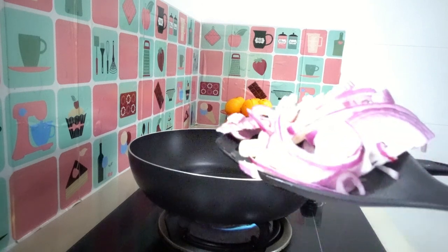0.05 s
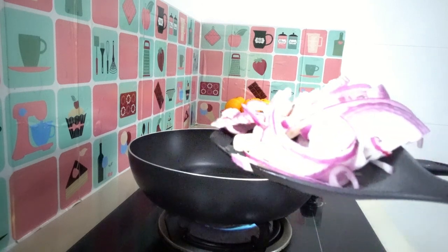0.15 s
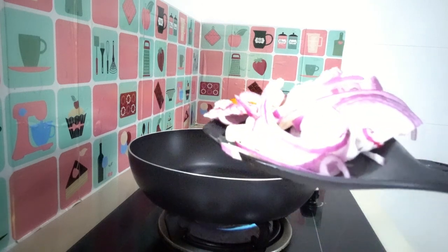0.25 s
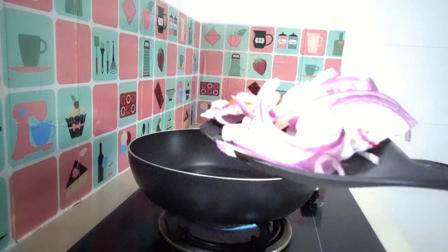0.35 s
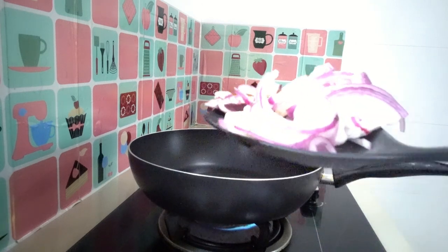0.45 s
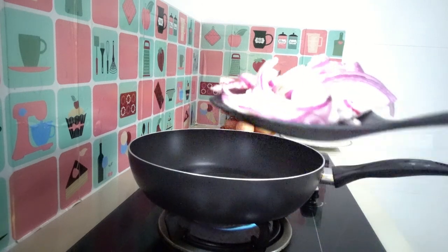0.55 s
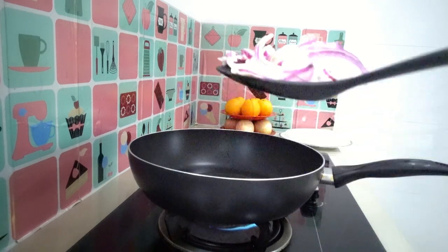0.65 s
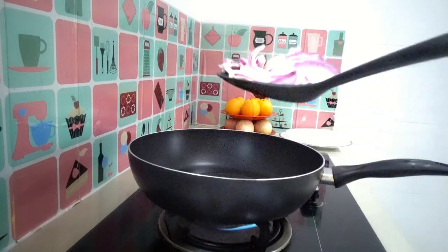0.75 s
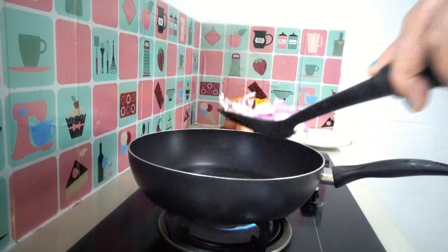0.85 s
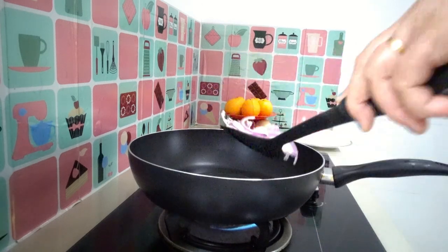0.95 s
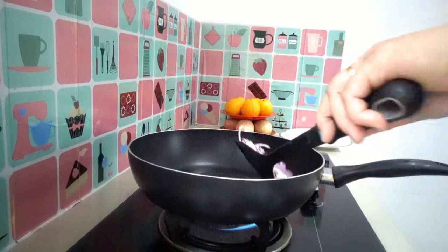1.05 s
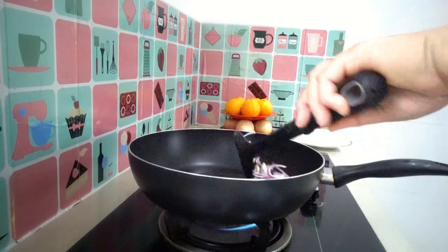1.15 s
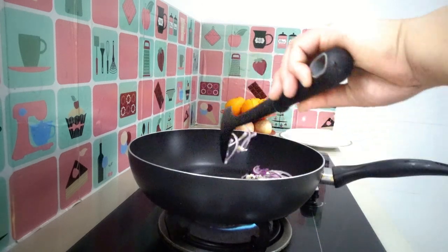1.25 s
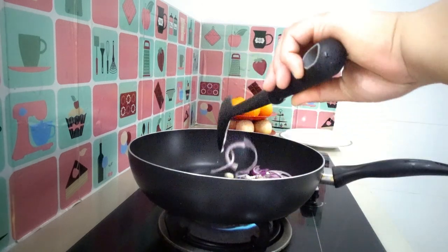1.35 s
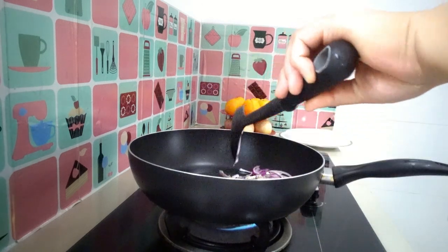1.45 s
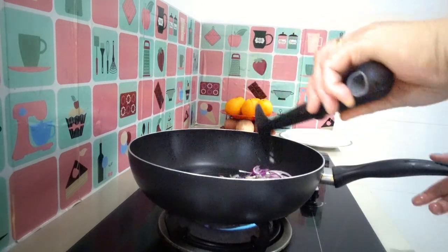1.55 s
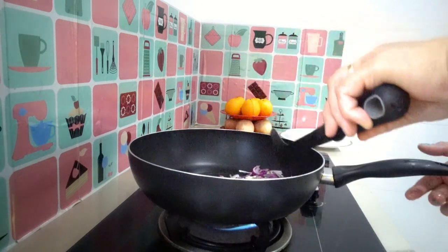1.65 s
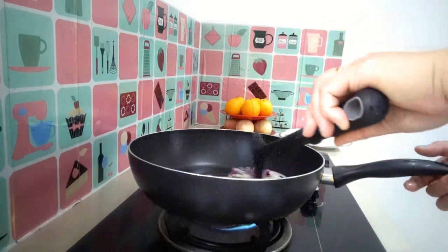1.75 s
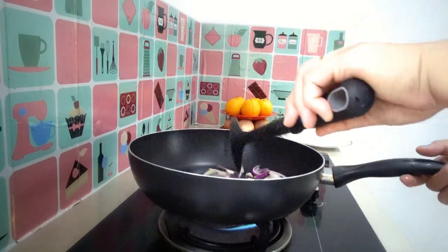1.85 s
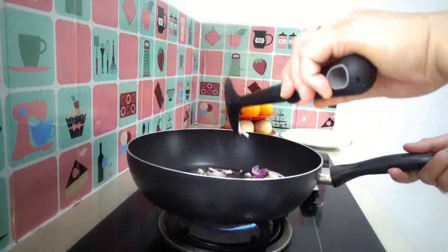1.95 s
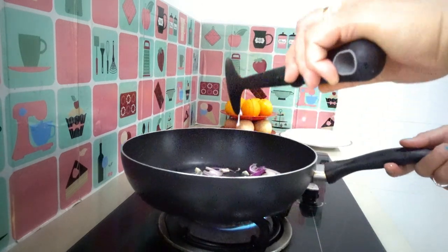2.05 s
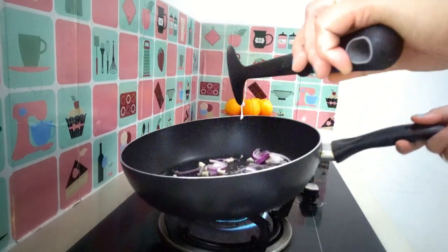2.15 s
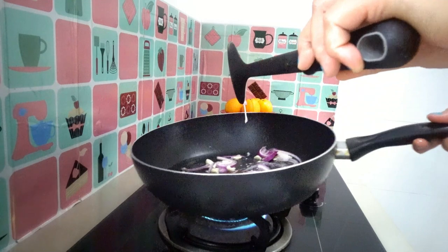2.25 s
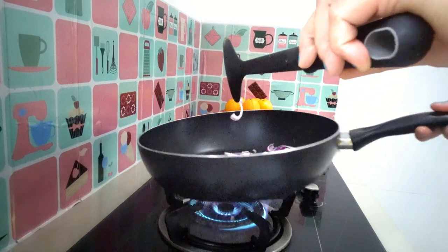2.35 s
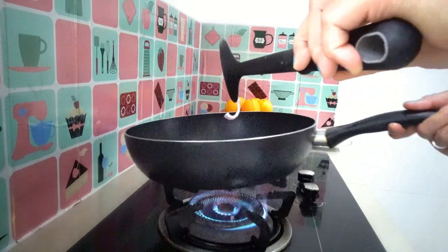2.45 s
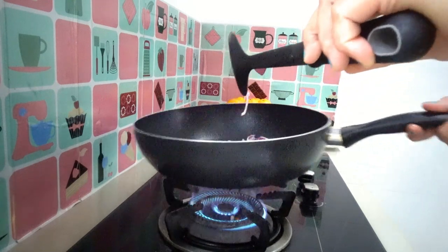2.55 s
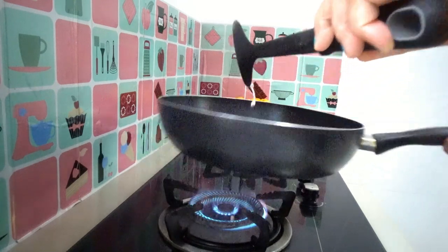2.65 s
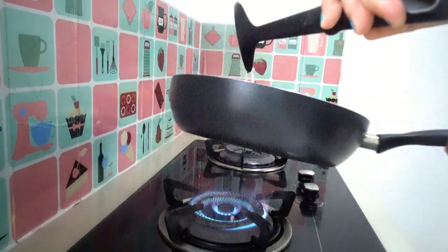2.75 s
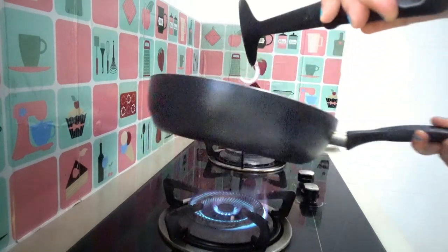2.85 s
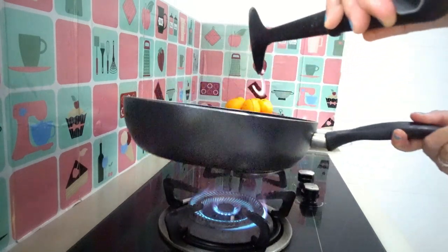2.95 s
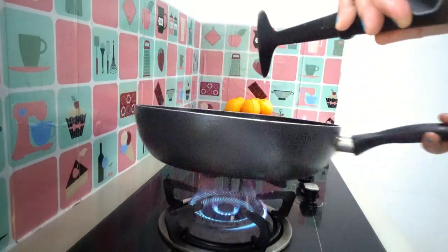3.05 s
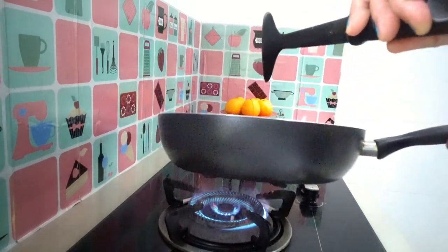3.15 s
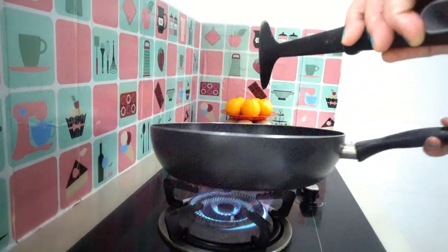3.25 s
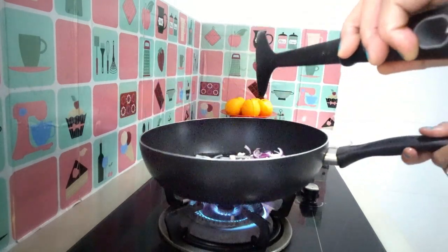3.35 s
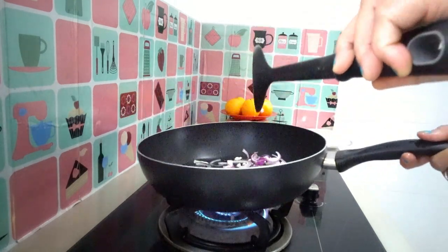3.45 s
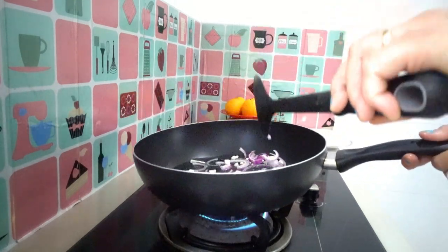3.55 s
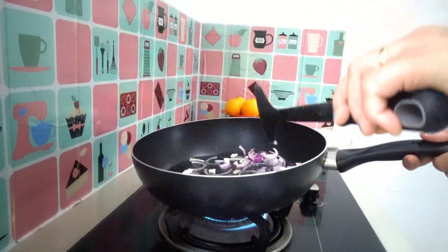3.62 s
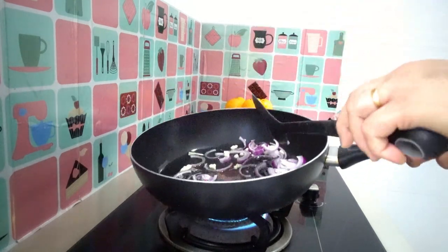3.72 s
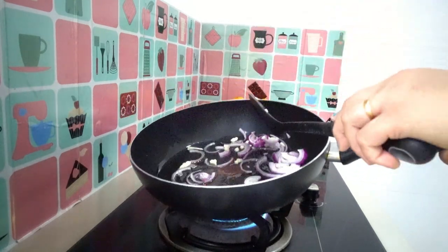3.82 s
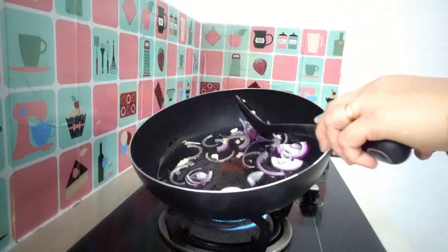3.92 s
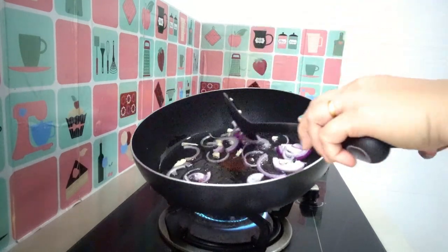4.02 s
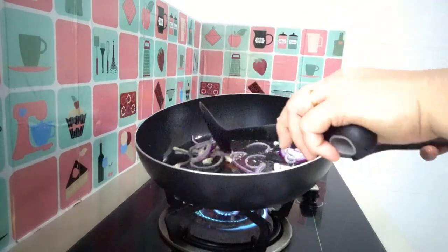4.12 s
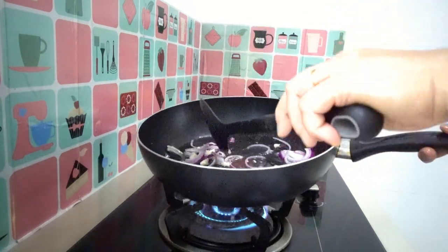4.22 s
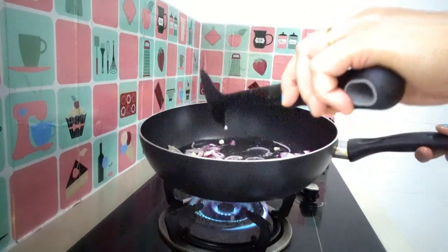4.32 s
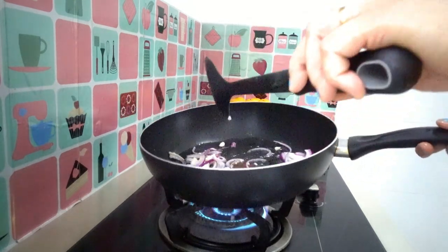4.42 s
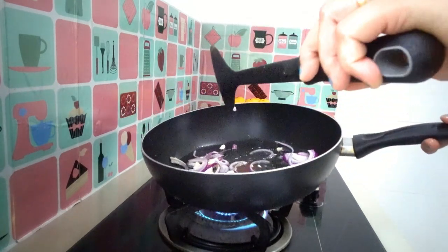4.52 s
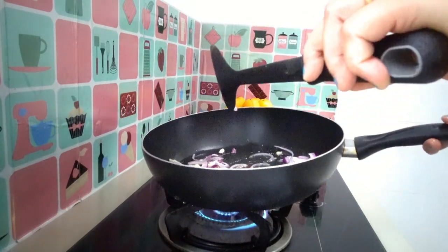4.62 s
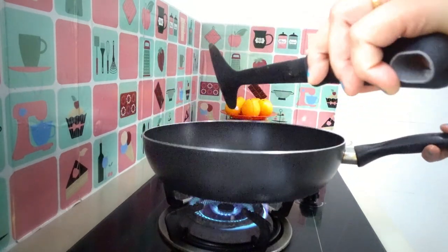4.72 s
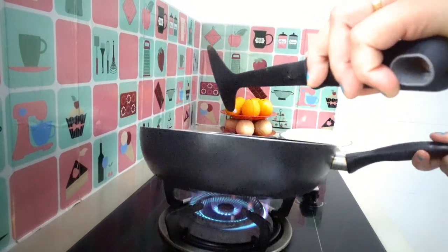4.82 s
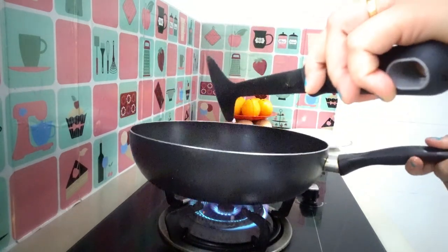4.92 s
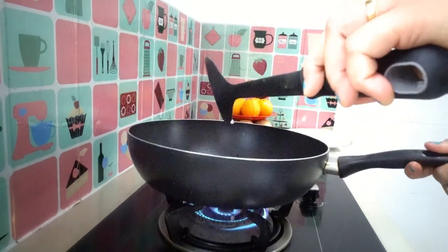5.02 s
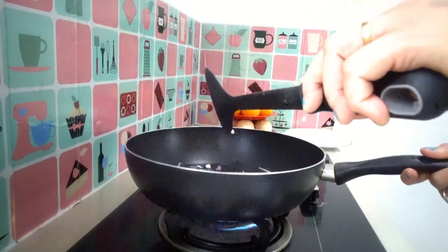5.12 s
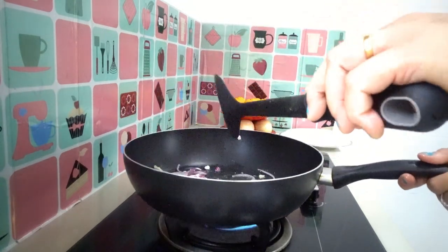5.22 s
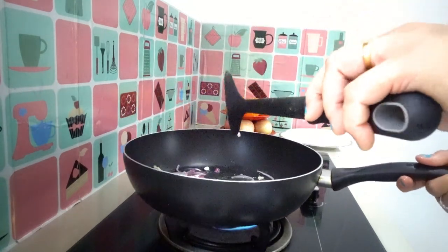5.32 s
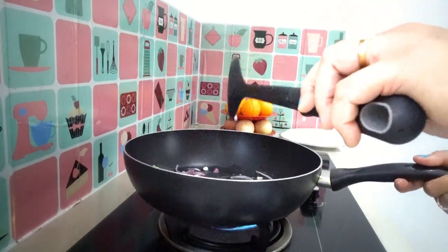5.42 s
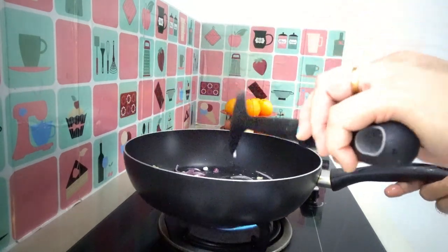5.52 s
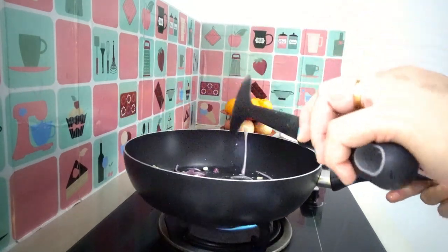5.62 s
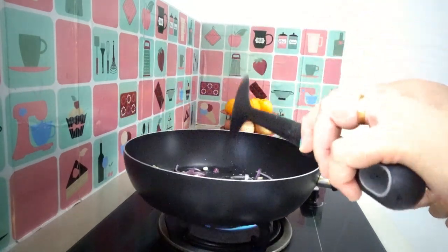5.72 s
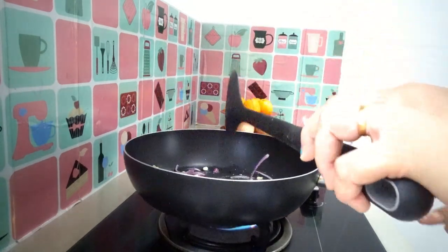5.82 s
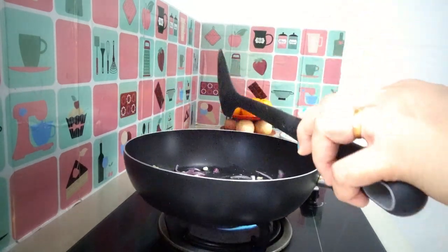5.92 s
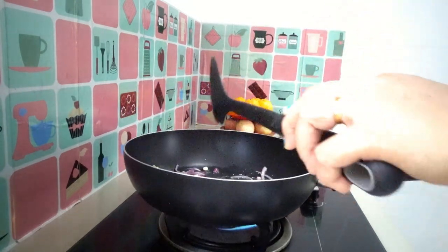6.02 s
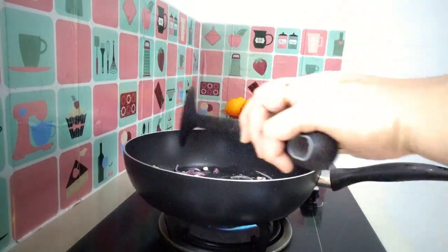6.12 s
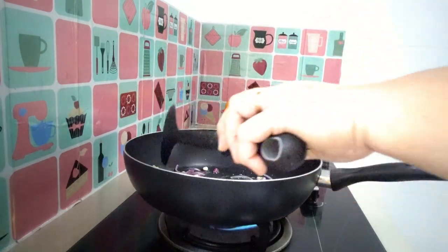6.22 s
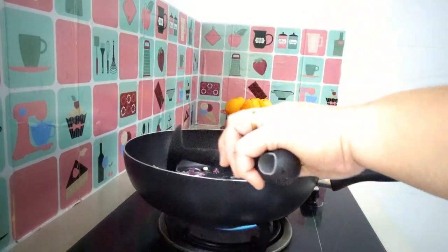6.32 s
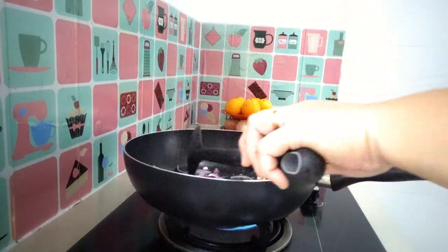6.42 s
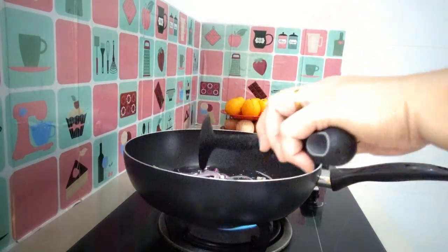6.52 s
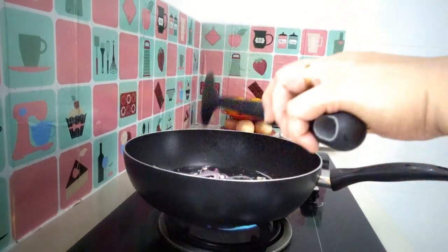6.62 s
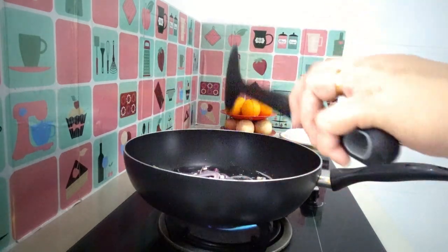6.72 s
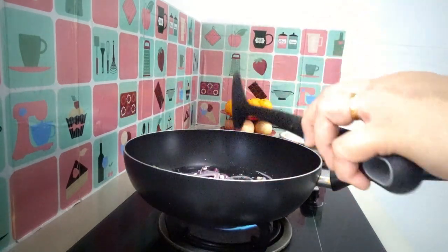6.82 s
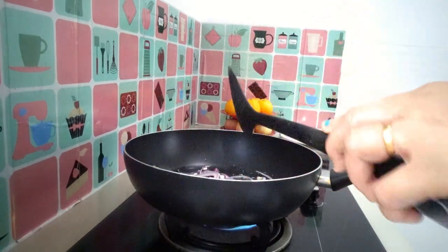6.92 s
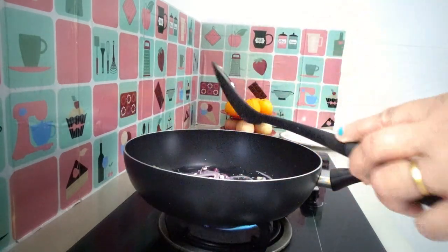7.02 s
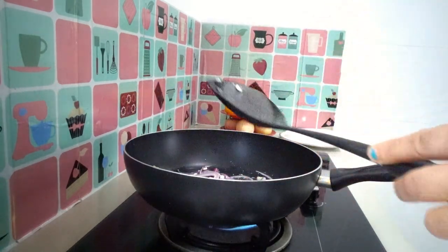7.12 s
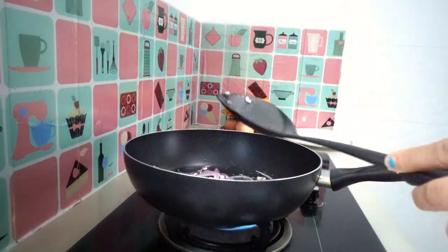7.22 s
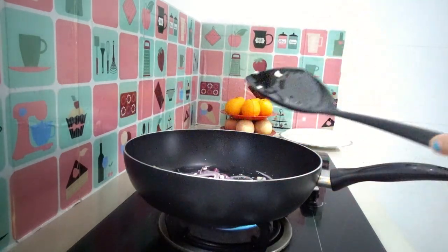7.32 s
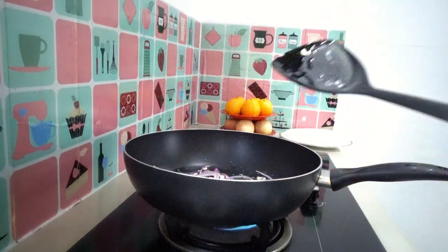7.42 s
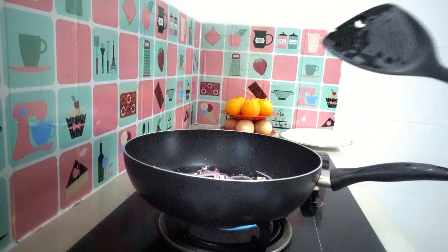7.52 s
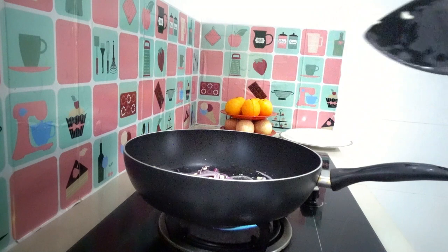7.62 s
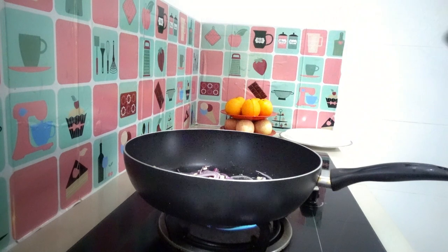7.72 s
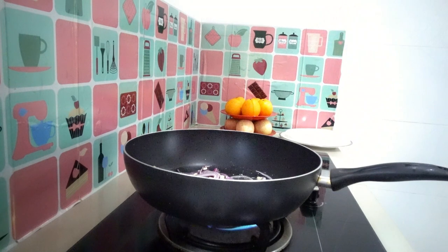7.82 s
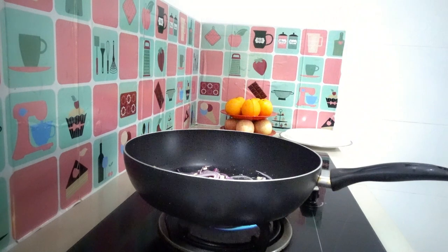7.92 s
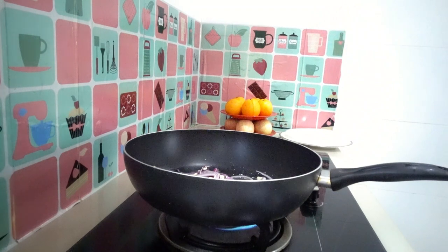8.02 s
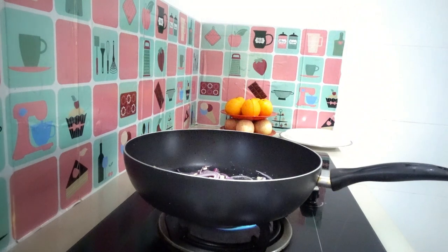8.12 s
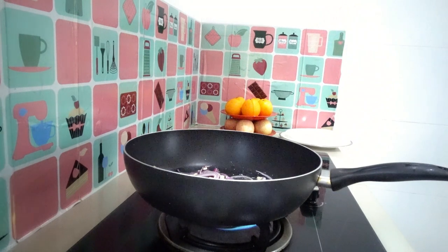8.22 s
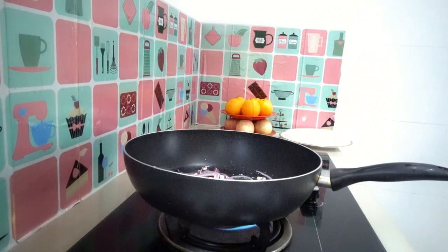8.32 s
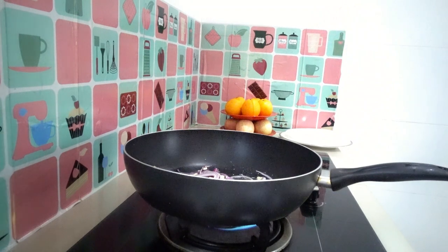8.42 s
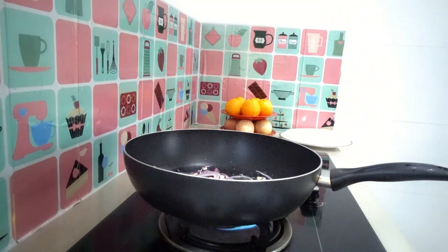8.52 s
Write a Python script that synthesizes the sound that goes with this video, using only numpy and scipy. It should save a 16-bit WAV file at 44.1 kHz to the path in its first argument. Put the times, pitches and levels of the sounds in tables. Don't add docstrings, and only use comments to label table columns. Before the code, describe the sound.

A close stereo microphone in a hard, tiled kitchen. At 0 s a last faint rattle of thin metal dies into quiet room noise and a high gas-flame hiss. At 1.1 s a spatula rings the pan sharply as onion meets hot oil and sizzling begins; softer knocks follow at 1.4 and 1.8 s. The sizzle brightens around 1.9 s. At 2.1 s the pan clanks onto the iron grate, with brief chatter. Light spatula touches come at 3.1 s. A hard landing at 3.5 s brings several blows, rattling and a ringing prong; a dull tap follows at 4 s among spits. The hardest crash hits at 4.85 s, slapping the oil, then another at 5.2 s, settling by 5.6 s with a bright echo. From there to 8.5 s, fine steady frying continues, briefly surging near 6.4 s, with crisp irregular pops.

```python
import sys
import numpy as np
from scipy import signal
from scipy.fft import rfft, irfft, next_fast_len
from scipy.io import wavfile
from scipy.ndimage import uniform_filter1d, minimum_filter1d, map_coordinates

SR = 44100
rng = np.random.default_rng(int(sys.argv[2]) if len(sys.argv) > 2 else 0)


def unload_wav(signal):
    wavfile.write(
        sys.argv[1],
        SR,
        np.round(np.clip(np.atleast_2d(signal).T, -1, 1) * 32767).astype(np.int16),
    )


def linear_from_db(decibels):
    return 10 ** (np.asarray(decibels, float) / 20)


N = 377496


def unit(x):
    return x / np.sqrt(np.mean(x ** 2) + 1e-20)


def along(points, hz):
    f, v = np.transpose(points)
    return np.interp(np.log(hz + 1), np.log(f + 1), v)


def curves(rows):
    s, *cols = np.transpose(rows)
    now = np.arange(N) / SR
    return [np.interp(now, s, c, left=-120, right=-120) for c in cols]


def wobble(rate_hz):
    knots = rng.standard_normal(int(N * rate_hz / SR) + 4)
    return map_coordinates(knots, [np.arange(N) * rate_hz / SR])


def filtered(x, response):
    m = next_fast_len(N + SR // 2)
    return irfft(rfft(x, m) * response(np.fft.rfftfreq(m, 1 / SR)), m)[..., :N]


def resonances(peaks):
    def response(f):
        total = 0
        for k, (hz, width, db) in enumerate(peaks):
            damping = 1j * f * width
            total = total + (-1) ** k * linear_from_db(db) * damping / (hz * hz - f * f + damping)
        return total
    return response


def causal(spectrum):
    cepstrum = irfft(np.log(linear_from_db(along(spectrum, np.fft.rfftfreq(4096, 1 / SR)))))
    cepstrum[1:2048] *= 2
    cepstrum[2049:] = 0
    pulse = irfft(np.exp(rfft(cepstrum)))[:2048]
    return pulse / np.linalg.norm(pulse)


# (frequency [Hz], likeness [0-1])
ALIKE = [(60, 1), (180, 0.94), (550, 0.77), (1650, 0.75), (4970, 0.45), (15000, 0.1)]


def spread(pair):
    def turn(hz):
        angle = np.arccos(np.clip(along(ALIKE, hz), -1, 1)) / 2
        return np.array([np.cos(angle), np.sin(angle)])
    mid, side = filtered(pair, turn)
    return np.array([mid + side, mid - side])


def rush(spectrum, patchy_db):
    z = signal.stft(rng.standard_normal((2, N)), nperseg=256)[2]
    field = uniform_filter1d(rng.standard_normal(z.shape[1:]), size=8, axis=0)
    field = uniform_filter1d(field, size=6, axis=1)
    pair = signal.istft(z * linear_from_db(patchy_db * unit(field)), nperseg=256)[1][:, :N]
    return unit(filtered(spread(pair), lambda hz: linear_from_db(along(spectrum, hz))))


def ticks(rate_hz, scatter_db):
    chance, size, sign = rng.random((3, N))
    heights = linear_from_db(-scatter_db * np.log(size + 0.12)) * np.sign(sign - .5)
    return unit((chance < rate_hz / SR) * heights)


def crackle(spectrum, rate_hz, scatter_db, life_s, snap_db):
    snaps = ticks(rate_hz, scatter_db)
    decay = np.exp(-np.arange(400) / (life_s * SR))
    gate = signal.fftconvolve(np.abs(snaps), decay)[:N]
    puffs = unit(spread(gate * rng.standard_normal((2, N))))
    burst = puffs + linear_from_db(snap_db) * snaps
    return unit(filtered(burst, lambda hz: linear_from_db(along(spectrum, hz))))


# (time [s], fizz level [dB], body level re fizz [dB])
FRY = [(1.112, -37, 8), (1.4, -41, 5.5), (1.65, -41.5, 0), (1.88, -32.5, -8.5), (2.1, -33, -3.5),
       (2.9, -34.5, -3.5), (3.46, -38.5, -7), (3.7, -40, 4), (4.0, -35, -2.5), (4.84, -35.5, -5.5),
       (5.5, -39, 2.5), (6.1, -39, -1), (6.37, -40, -1.5), (6.42, -33.5, -4), (6.6, -35.5, -3.5),
       (7.2, -38, -2), (8.3, -39, -3), (8.56, -36.5, -3)]
# (frequency [Hz], density [dB per Hz])
FIZZ = [(400, -70), (1200, -20), (1800, -7), (2600, -2), (5500, 1), (9000, 0), (12000, -.5), (14400, -1.5),
        (16000, -3)]
# (frequency [Hz], density [dB per Hz])
BODY = [(300, -57), (350, -12), (430, -4), (800, -4.5), (1600, -1.5), (3000, -0.5), (5000, -2.5),
        (9000, -30.5)]


def sizzle():
    fizz_db, body_db = curves(FRY)
    boil_db = 0.4 * wobble(7) + 0.77 * wobble(30)
    fizz = rush(FIZZ, patchy_db=1.5)
    fizz = fizz + linear_from_db(-6) * crackle(FIZZ, rate_hz=400, scatter_db=4, life_s=.0007, snap_db=-6)
    body = rush(BODY, patchy_db=1.8)
    body = body + linear_from_db(-11) * crackle(BODY, rate_hz=200, scatter_db=6.5, life_s=0.0017, snap_db=-7)
    fizz_gain = linear_from_db(fizz_db + boil_db + 5)
    body_gain = linear_from_db(fizz_db + body_db + boil_db - 1.9)
    return fizz_gain * unit(fizz) + body_gain * unit(body)


# (time [s], peak level [dB], top part level [dB])
POPS = [(1.3995, -24, -27), (1.518, -22, -22), (3.07, -18, -20), (3.3119, -22, -16), (3.8741, -26, -9),
        (3.9277, -19, -21), (3.9488, -17, -8.5), (4.017, -14, -17.5), (4.4227, -16.5, -15),
        (4.5834, -21, -11), (4.724, -22, -19), (5.681, -27, -24), (5.7524, -18, -16), (5.8965, -18.5, -21),
        (6.0986, -18.5, -11), (6.1512, -13.5, -11), (6.3859, -21, -20), (6.4094, -17, -11),
        (6.495, -13, -17.5), (7.529, -24, -18), (6.864, -16, -9), (6.889, -14.5, -22.5), (6.9244, -18, -19),
        (7.394, -18.5, -12), (7.433, -20, -12), (7.5656, -16, -17), (7.892, -16.5, -19),
        (8.0225, -14.5, -13), (8.4282, -20.5, -11), (8.4691, -15, -19.5)]
POP_T60_S, AFTERHISS_DB, AFTERHISS_T60_S = .028, -17, .3
DROP_LOW_DB, LOW_PER_TOP = -14.5, -1.92
SLAP_LOW_DB, SLAP_TOP_DB = -5, -31


def pops():
    t = np.arange(SR // 3) / SR
    parts = np.zeros((3, 3, N + SR))
    drops = [(s, db, DROP_LOW_DB + LOW_PER_TOP * (top_db + 16.5), top_db) for s, db, top_db in POPS]
    slaps = [(s, oil_db, SLAP_LOW_DB, SLAP_TOP_DB) for s, *_, oil_db in BLOWS]
    spray = linear_from_db(-60 * t / POP_T60_S) + linear_from_db(AFTERHISS_DB - 60 * t / AFTERHISS_T60_S)
    for s, db, low_db, top_db in drops + slaps:
        burst = linear_from_db(db - 7.5) * spray * rng.standard_normal((3, 3, len(t)))
        burst[:, 2] = 0
        burst[:, 2, [0, 35]] = linear_from_db(db + 8) * np.array([1, -.6])
        part_gain = linear_from_db([[[low_db + 0.5]], [[-3]], [[top_db + 13.0]]])
        parts[..., round(s * SR):][..., :len(t)] += part_gain * burst
    middle = [(1200, -50), (2500, 0), (8000, 0), (12000, -9), (22000, -24)]  # (Hz, dB)
    top = [(4500, -30), (8500, -3), (16000, -1)]
    heard = 0
    for part, colour in zip(parts, (BODY, middle, top)):
        heard = heard + signal.fftconvolve(part, causal(colour)[None], axes=1)[:, :N]
    return spread(heard[:2]) + heard[2]


# (time [s], bowl level [dB], rim level [dB], ring length [factor])
TAPS = [
    (1.114, -8, -8.5, 0.59),
    (1.381, -8.5, -30, 0.27),
    (1.402, -16, -19, 0.15),
    (1.519, -24, -34, 0.38),
    (1.826, -23.5, -31, 0.54),
    (3.123, -20.5, -27, 0.27),
    (3.149, -37, -31, 0.15),
    (4.017, -36, -20, 0.1),
]
# (frequency [Hz], level [dB], t60 [s])
PAN = [(511, -19, .5), (531, -15, .4), (621, -9, .083), (790, -19, .33), (1146, -12, .12), (1851, -4, .23),
       (1905, -9, .15), (2316, -17, .25), (2440, -16, .15), (2566, -17, .25), (3301, -14, .45),
       (3420, -16, .2), (4850, -26, .3), (6568, -27, .5)]


def taps():
    out, t = np.zeros(N + SR), np.arange(SR) / SR
    slosh = 1.2 * wobble(60)[:SR]
    band = signal.butter(2, [3600, 8000], "band", fs=SR)
    for s, bowl_db, rim_db, length in TAPS:
        length = max(length, .05)
        ring = 0
        for k, (hz, mode_db, t60_s) in enumerate(PAN):
            strike_db = np.interp(np.log2(hz / 700), [0, 1], [bowl_db, rim_db])
            phase = 2 * np.pi * hz * t + np.roll(slosh, 3000 * k)
            ring = ring + linear_from_db(mode_db + strike_db - 60 * t / (t60_s * length)) * np.sin(phase)
        blow = linear_from_db(rim_db - 2.5 - 60 * t / 0.038)
        faint_modes = linear_from_db(rim_db - 33 - 60 * t / (0.81 * length))
        noise = signal.lfilter(*band, rng.standard_normal(len(t)))
        onset = 1 - np.exp(-t / .002)
        out[round(s * SR):][:len(t)] += ring * onset + (blow + faint_modes) * noise
    return out[:N]


# (time [s], peak level [dB], crack level [dB], clank [Hz], slapped oil level [dB])
BLOWS = [(2.104, -9.5, -11, 1130, -13), (2.117, -16, -13, 2000, -30), (2.154, -7.5, -18, 1160, -24),
         (3.474, -0.5, -15, 2005, -7), (3.513, -3.5, -10, 1320, -8), (3.537, -22, -17, 1260, -45),
         (3.561, -5, -17, 2500, -30), (3.576, -0.5, -2, 2030, -34), (3.636, -9, -15, 666, -30),
         (3.72, -37, -13, 1200, -18.5), (3.759, -22.5, -9, 1240, -39), (4.8485, 0.5, -29, 1490, 3.5),
         (4.875, -26, -19, 1510, -74), (4.902, -15, -17, 1470, -30), (4.945, -7, -18, 1640, -30),
         (5.089, -28, -12, 1470, -37), (5.211, -3, -14, 2030, -2.5), (5.243, -4.5, -12, 673, -26),
         (5.457, -17, -12, 1340, -35)]
SETTLE_DB, SETTLE_T60_S = -4, 0.22
SHAKE_DB, SHAKE_T60_S = -6, 0.081


def blows_within(start, end):
    return [blow for blow in BLOWS if start - .003 < blow[0] < end - .003]


def chatter(start, end, flight_s, db, fade_db_per_s):
    now = np.arange(N) / SR

    def dying(s, level_db, slope):
        active = (now >= s) * (now < end)
        return active * linear_from_db(level_db - slope * np.clip(now - s, 0, end - s))

    bed = dying(start + flight_s, db, fade_db_per_s)
    bed = bed + dying(start + flight_s, db + SETTLE_DB, 60 / SETTLE_T60_S)
    for s, blow_db, *_ in blows_within(start, end):
        bed = bed + dying(s, blow_db + SHAKE_DB, 60 / SHAKE_T60_S)
    return bed


def brighter(x, db):
    return x + (linear_from_db(db) - 1) * filtered(x, lambda f: 1j * f / (3000 + 1j * f))


# (time [s], first flight [s], chatter level [dB], fade [dB per s], loose contact [Hz])
LANDINGS = [
    (0, 0, -37.5, 58, 2040),
    (2.011, 0.0095, -44, -230, 460),
    (2.105, .05, -24.5, 56, 464),
    (3.474, 0.04, -23, 39.5, 1270),
    (4.85, 0, -17.5, 55, 1490),
    (5.212, 0.026, -19.5, 55, 800),
    (5.358, 0.002, -24, 53, 1370),
    (5.541, 0, -35.5, 52, 1230),
]
GRATE_HZ = [400, 480, 645, 870, 1125, 1300, 1500, 1965, 2310, 2450, 2830, 3085, 3300, 4000]
# (width [Hz], level [dB])
GRATE = [(50, -3), (39, 5.5), (55, -3), (11, -35), (55.5, 1), (120, -15.5), (40, -10), (43, 2), (50, -2.5),
         (50, 0.5), (64.8, -31), (40.6, 2.5), (35, -6), (59.259, -14)]
# (frequency [Hz], density [dB per Hz])
THUD = [(24, -98), (40, -42.5), (182, -13.5), (400, 0), (1100, -5.5), (3400, -7.5), (4300, -8),
        (15000, -32)]
TREBLE_DB, TREBLE_PER_DB = -5, 0.76
LOOSE_DB, LOOSE_WIDTH = 6.5, 0.097


def clatter():
    out, thud, t = np.zeros(N + SR), causal(THUD), np.arange(SR // 10) / SR
    ring = resonances([(hz, 1.4 * width, db) for hz, (width, db) in zip(GRATE_HZ, GRATE)])
    ring_rms = np.sqrt(np.mean(np.abs(ring(np.fft.rfftfreq(8192, 1 / SR))) ** 2))
    ends = [row[0] for row in LANDINGS[1:]] + [N / SR]
    for (start, flight_s, level_db, fade, loose_hz), end in zip(LANDINGS, ends):
        contacts = linear_from_db(-4.5) * ticks(rate_hz=650, scatter_db=3.0)
        force = chatter(start, end, flight_s, level_db, fade) * contacts
        force = brighter(force, TREBLE_DB + 6 + TREBLE_PER_DB * (level_db + 23.5))
        for s, db, crack_db, hz, _ in blows_within(start, end):
            force[round(s * SR)] += linear_from_db(db + 3.0)
            clank = np.sin(2 * np.pi * hz * t) * linear_from_db(db - 2 - 60 * t / 0.02)
            hiss = np.diff(rng.standard_normal(len(t) + 1))
            crack = hiss * linear_from_db(db + crack_db - 14 - 60 * t / .025)
            out[round(s * SR):][:len(t)] += clank + signal.lfilter([.5], [1, -.5], crack)
        loose = resonances([(loose_hz, LOOSE_WIDTH * loose_hz, LOOSE_DB)])
        force = force + filtered(force, loose)
        out[:N] += linear_from_db(-5.5) * filtered(force, ring) / ring_rms
        out[:N] += linear_from_db(-1.5) * signal.fftconvolve(force, thud)[:N]
    return out[:N]


# (time [s], frequency [Hz], level [dB], t60 [s])
PRONGS = [
    (2.104, 2500, -21, .04),
    (3.475, 4650, -22, .035),
    (3.513, 3704, -22, .5),
    (4.016, 2460, -24, .05),
    (4.851, 3693, -17, .2),
    (4.85, 4800, -26, .1),
    (5.212, 2300, -21, .05),
    (5.247, 3704, -19, .2),
]


def prongs():
    out, t = np.zeros(N + SR), np.arange(SR // 2) / SR
    onset = 1 - np.exp(-t / 0.00038)
    for s, hz, db, t60_s in PRONGS:
        out[round(s * SR):][:len(t)] += linear_from_db(db - 60 * t / t60_s) * np.sin(2 * np.pi * hz * t) * onset
    return out[:N] * linear_from_db(1.1 * wobble(50))


# (frequency [Hz], t60 [s])
TILES = [(200, 0.72), (1000, 1), (4000, 0.96), (12000, 0.59)]


def kitchen(x):
    wet, step = np.zeros((2, N + 2 * SR)), SR * 2 // 5
    for start in range(0, N, step):
        hz, t, z = signal.stft(rng.standard_normal((2, SR * 3 // 4)), SR, nperseg=256)
        decay = linear_from_db(-60 * t / along(TILES, hz)[:, None])
        tail = signal.istft(z * decay, SR, nperseg=256)[1]
        tail = tail / np.linalg.norm(tail[0])
        echo = signal.fftconvolve(x[None, start:start + step], tail, axes=1)
        wet[:, start + 90:][:, :echo.shape[1]] += echo
    return spread(wet[:, :N])


# (frequency [Hz], density [dB per Hz])
AIR = [(40, -60), (80, -32), (120, -20.5), (170, -12), (240, -15), (300, -28), (350, -18.5), (470, -5.5),
       (700, -8.5), (950, -11.5), (1900, -15), (4670, -27.5), (8000, -33.5), (16000, -43)]
# (time [s], level [dB])
AIR_DB = [(0, -49), (1.1, -51), (1.6, -52), (3, -51.5), (4.5, -50), (6, -51.5), (7, -53.5), (8.56, -54.5)]
# (frequency [Hz], width [Hz], level [dB])
FLAME = [(4900, 29, -7), (6120, 80, 13), (6990, 160, 17)]


def stove():
    jets = unit(filtered(rng.standard_normal((2, N)), resonances(FLAME)))
    drift_db = .5 * wobble(5.56)
    flicker_db = -12.0 + 0.37 * wobble(3.6)
    return linear_from_db(curves(AIR_DB)[0] + drift_db) * (rush(AIR, patchy_db=1.5) + linear_from_db(flicker_db) * jets)


def scene():
    tap, crash = taps(), clatter() + prongs()
    echo = kitchen(linear_from_db(-1.5) * tap + linear_from_db(-4.0) * crash)
    return tap + crash + echo + sizzle() + pops() + stove()


def band_limit(x):
    return signal.sosfilt(signal.butter(12, 17030, fs=SR, output="sos"), x)


# (frequency [Hz], left minus right [dB])
LEAN = [(60, 0), (240, 0.5), (950, -1.5), (3770, -1.5), (15000, -3)]
LEAD_SAMPLES, LEAD_FADES_HZ = 3.3, 6260
TOP_HZ = 16050


def record(dry):
    port = np.array([[.5], [-.5]])

    def mic(hz):
        lead_s = LEAD_SAMPLES / SR / (1 + (hz / LEAD_FADES_HZ) ** 2)
        bass_cut = (1j * hz / (110 + 1j * hz)) ** 2
        return linear_from_db(port * along(LEAN, hz)) * np.exp(2j * np.pi * hz * port * lead_s) * bass_cut

    ports = filtered(dry, mic)
    needed = np.minimum(1, 0.56 / (np.abs(ports).max(axis=0) + 1e-9))
    gain = uniform_filter1d(minimum_filter1d(needed, size=201), size=161)
    mix = filtered(gain * ports, lambda hz: hz < TOP_HZ)
    return band_limit(mix)


dry = scene()
out = record(dry)
unload_wav(out)
```